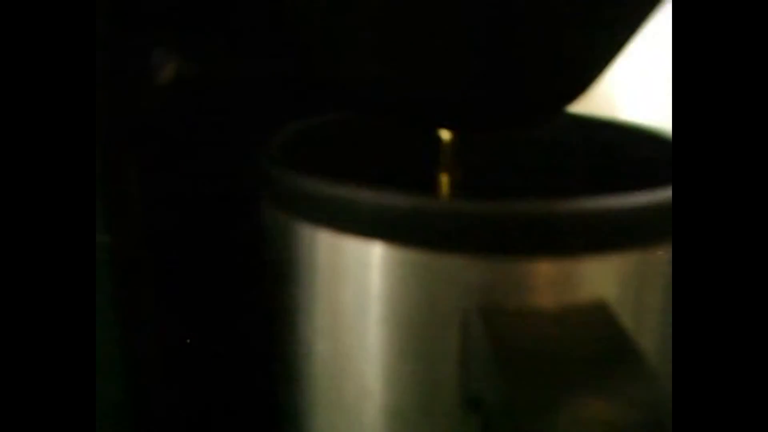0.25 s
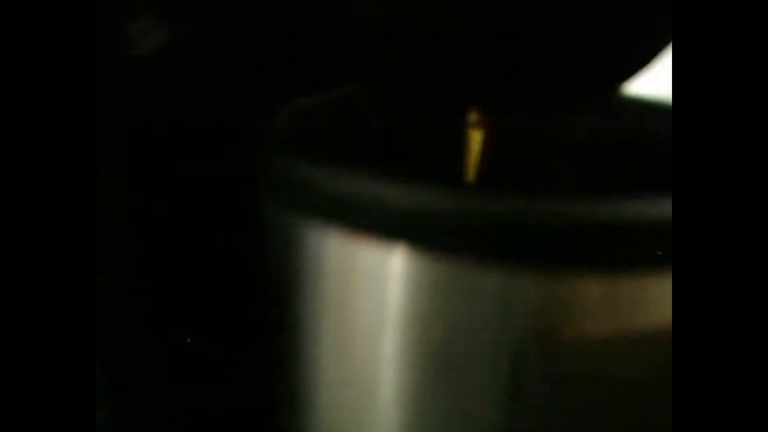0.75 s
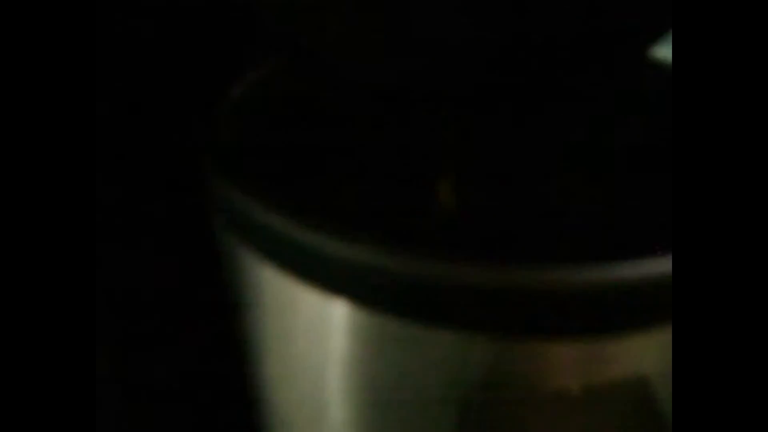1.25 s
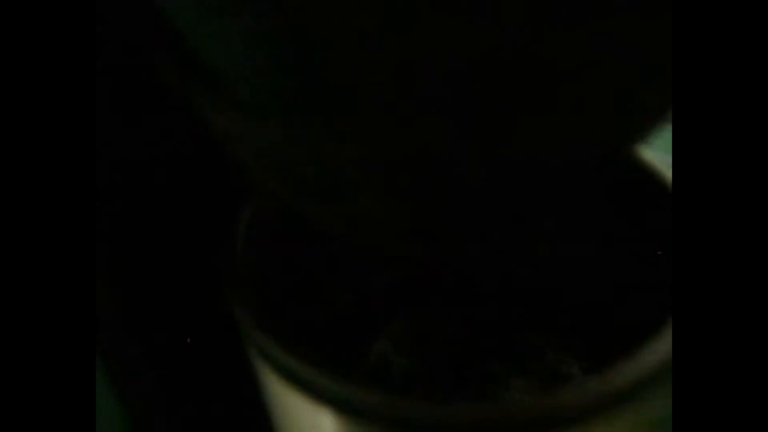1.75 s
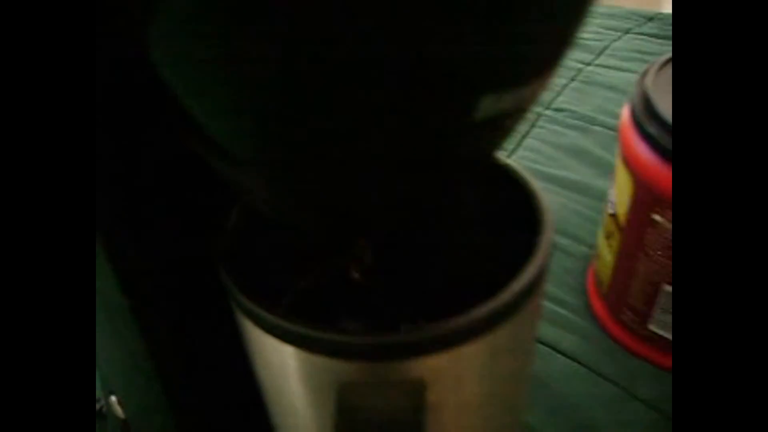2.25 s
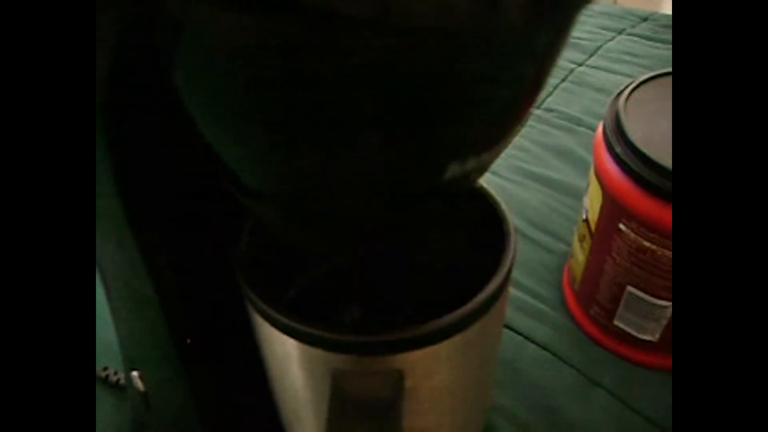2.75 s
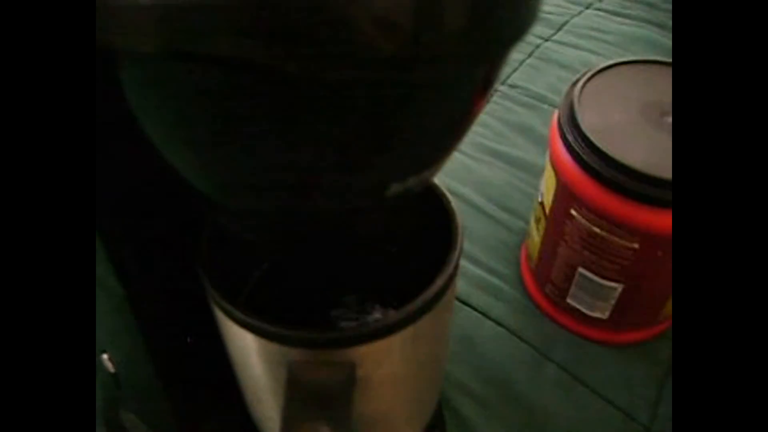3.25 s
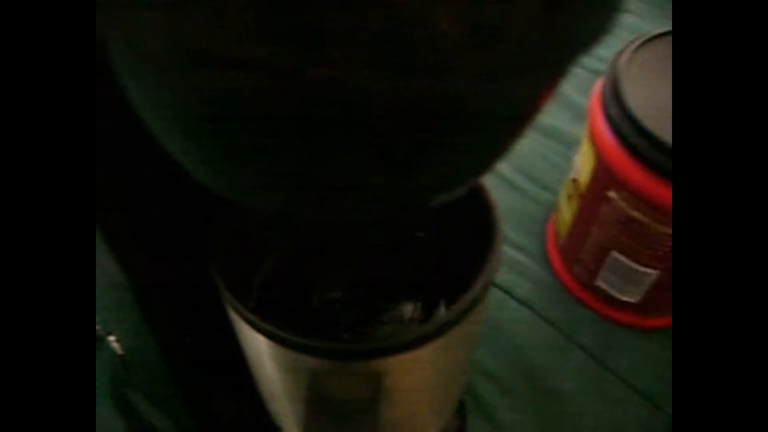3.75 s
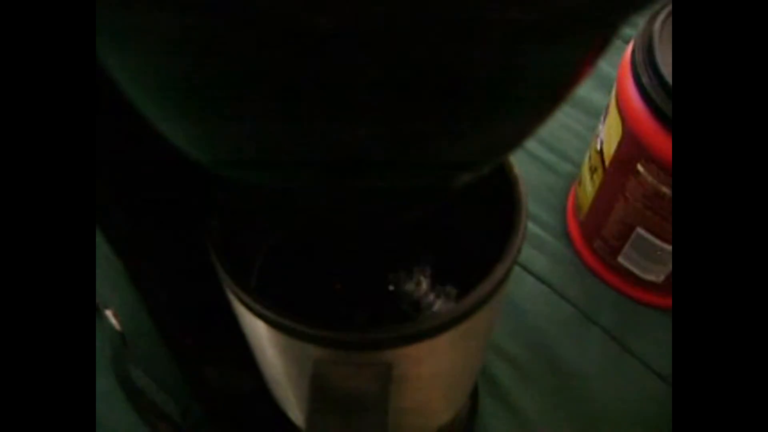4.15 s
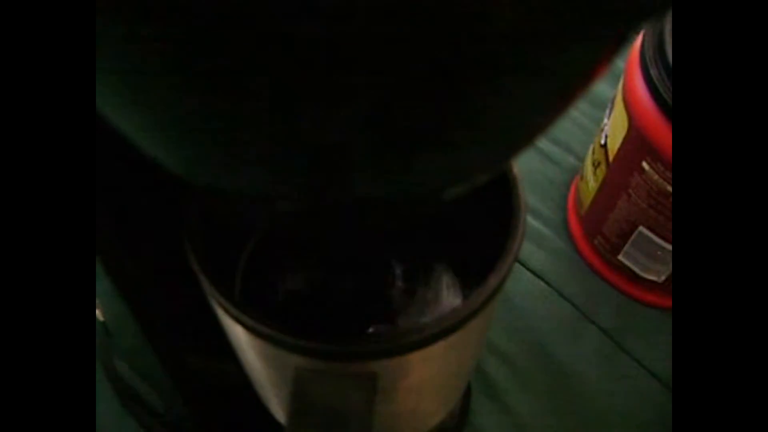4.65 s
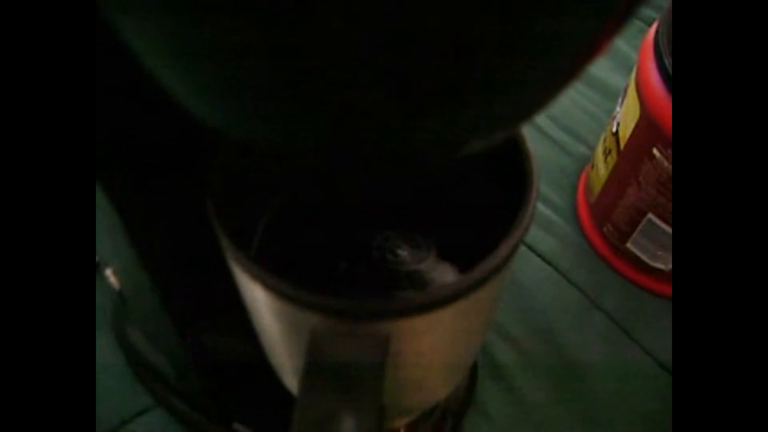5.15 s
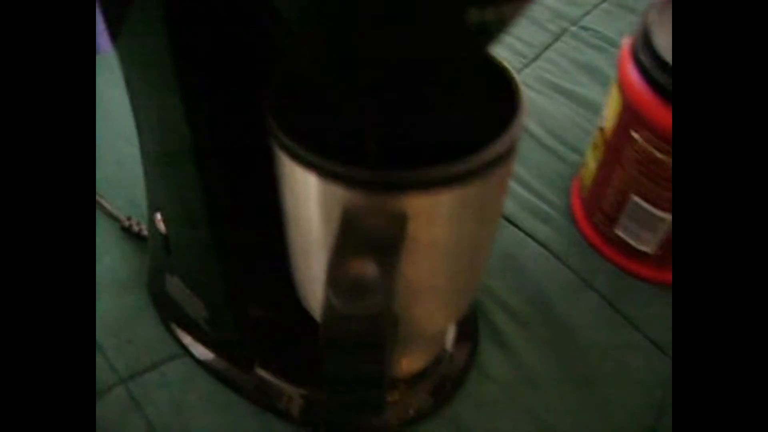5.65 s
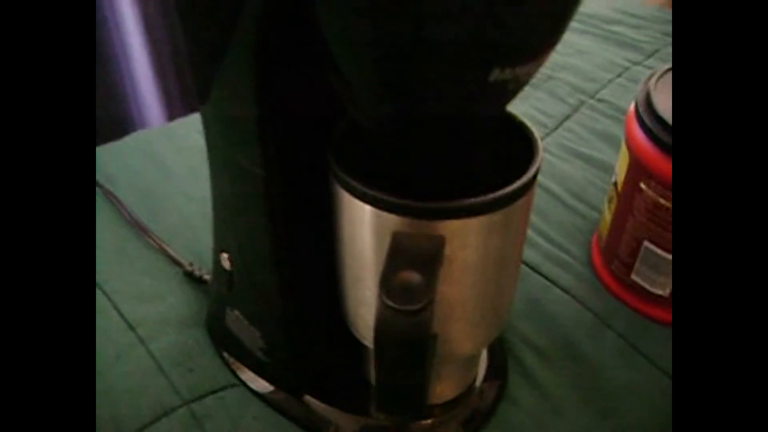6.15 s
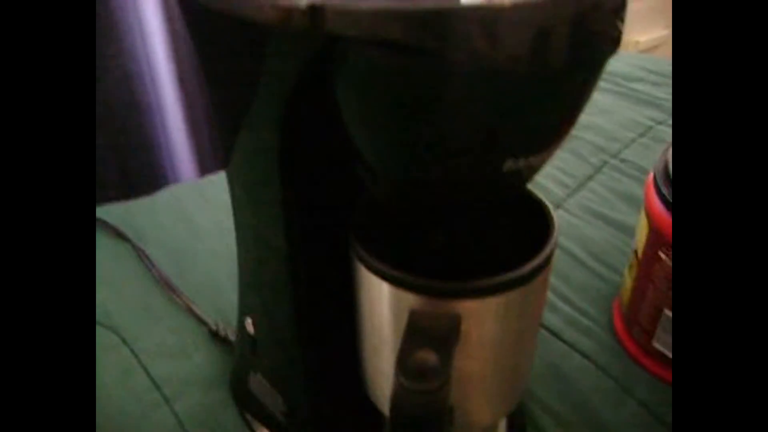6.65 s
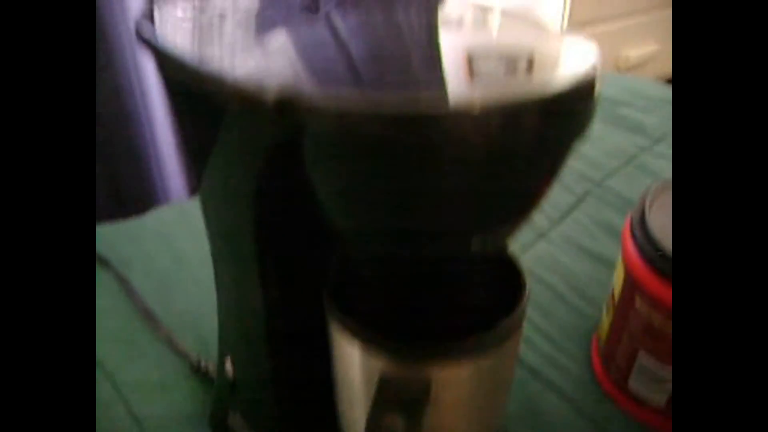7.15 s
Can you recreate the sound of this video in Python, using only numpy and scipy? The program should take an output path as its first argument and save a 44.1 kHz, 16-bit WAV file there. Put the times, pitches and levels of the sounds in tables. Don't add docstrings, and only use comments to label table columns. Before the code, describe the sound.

Close, dull-sounding gurgling and popping of a drip brewer running dry, thinning to a steady steamy simmer, then sputtering again at the end.

```python
import sys
import numpy as np
from scipy import signal
from scipy.fft import rfft, irfft, next_fast_len
from scipy.io import wavfile

SR = 44100
rng = np.random.default_rng(int(sys.argv[2]) if len(sys.argv) > 2 else 0)


def bounce(signal):
    frames = np.transpose(np.atleast_2d(signal))
    limited = np.clip(frames, -1, 1)
    pcm = np.round(limited * 32767).astype(np.int16)
    wavfile.write(sys.argv[1], SR, pcm)


def magnitude_from_level(level_db):
    exponent = np.asarray(level_db, float) / 20
    return 10 ** exponent


N = 326781


def rms_one(x):
    return x / np.sqrt(np.mean(x ** 2) + 1e-20)


def in_time(rows):
    s, *columns = np.transpose(rows)
    return [np.interp(np.arange(N) / SR, s, c) for c in columns]


def coloured(spectrum, source):
    hz, db = np.transpose(spectrum)
    size = next_fast_len(N)
    grid = np.arange(size // 2 + 1) * SR / size + 1
    shape = magnitude_from_level(np.interp(np.log(grid), np.log(hz), db))
    return rms_one(irfft(shape * rfft(source, size), size)[:N])


def flicker(rate_hz, depth_db):
    r = np.exp(-2 * np.pi * rate_hz / SR)
    slow = signal.lfilter([1], [1, -2 * r, r * r], rng.standard_normal(N + SR))[SR:]
    return magnitude_from_level(depth_db * rms_one(slow))


def pole_pair(hz, width_hz):
    r = np.exp(-np.pi * width_hz / SR)
    return r, [1, -2 * r * np.cos(2 * np.pi * hz / SR), r * r]


def resonate(x, peaks):
    out = 0
    for hz, width_hz, db in peaks:
        r, poles = pole_pair(hz, width_hz)
        out = out + magnitude_from_level(db) * signal.lfilter([1 - r, 0, r - 1], poles, x)
    return rms_one(out)


def low_passed(x, cutoff_hz):
    return rms_one(signal.sosfilt(signal.butter(2, cutoff_hz, fs=SR, output="sos"), x))


def behind_mug():
    leaves_s, leaving_s = 1.1, 0.23
    return np.clip(1 - (np.arange(N) / SR - leaves_s) / leaving_s, 0, 1)


# t/s, level/dB over the hiss
BASKET_VIEW = [(0, -17), (1.5, -16.5), (6.78, -14.5), (7.0, -8.5), (7.41, -1.5)]


def basket_view():
    return in_time(BASKET_VIEW)[0]


# t/s, churn level/dB, nearness level/dB
BOIL = [(0, 14, 1.5), (.4, 16.5, 0.5), (1.17, 15, 2), (1.32, 23.5, 5.5), (1.5, 19, 1.5), (1.75, 13.5, 2.5),
        (2.05, 10.5, .5), (2.3, 7.5, -1), (2.8, 4.5, -0.5), (3.4, 3, -1.5), (4.5, -1.5, 1.95),
        (5.55, -2.5, 2.1), (5.8, -3.5, -1.5), (6.3, -0.5, -3.5), (6.81, 2, -4), (6.87, 10.5, -2),
        (7.1, 13, 6.5), (7.41, 7.5, 5)]
# level/dB, share of churn [dB/dB], share of nearness [dB/dB],
# share of the open basket [dB/dB], gain behind the mug/dB
LAYERS = [
    (-45, 0.29, 1.04, -0.11, -1.5),
    (-53, 0.97, 0.51, 0.0013, 2),
    (-48, 0.042, 0.83, -0.033, -16),
    (-49.5, .05, 0.59, 0.081, -2),
    (-47.5, 0.075, 1, -0.79, -2.5),
]


def layer_levels(basket_db):
    churn_db, near_db = in_time(BOIL)
    opened_db = basket_db - basket_db.min()
    levels = []
    for db, churn, near, opened, mug_db in LAYERS:
        source_db = db + churn * churn_db + near * near_db
        levels.append(source_db + opened * opened_db + mug_db * behind_mug())
    return levels


# f/Hz, width/Hz, level/dB
LOWER_HOLLOW = [(614, 57, 6.5), (521, 49, -3)]
# f/Hz, width/Hz, level/dB
UPPER_HOLLOW = [(928, 83, 21), (1080, 29, -10)]
# f/Hz, width/Hz, level/dB
RIM = [(1050, 105, 0)]
# f/Hz, level/dB per Hz
TOP_SHELF = [(480, -28.5), (820, -1.5), (970, -16), (1050, -7), (1170, 4), (1550, -7), (1940, 6),
             (2070, 4.5), (2300, -3.5), (2990, -45), (5060, -120)]


def simmer():
    sizes = magnitude_from_level(5.2 * np.minimum(rng.exponential(1, N), 4)) * rng.choice([-1, 1], N)
    collapses_per_s = 350 * flicker(rate_hz=15, depth_db=5.0)
    born = rng.random(N) < collapses_per_s / SR
    smooth = rng.standard_normal(N) * flicker(rate_hz=3.87, depth_db=2.0)
    drive = rms_one(sizes * born) * 0.65 + smooth
    upper = resonate(drive, UPPER_HOLLOW)
    at_rim = resonate(resonate(drive, RIM), RIM)
    upper = upper + 0.59 * behind_mug() * (at_rim - upper)
    return resonate(drive, LOWER_HOLLOW), upper, coloured(TOP_SHELF, drive), drive


# f/Hz, width/Hz, level/dB
MOUTH = [(466, 200, 9), (820, 710, 7), (1060, 67, -18)]


def basket_mouth(drive, basket_db):
    return magnitude_from_level(-35.5 + 2.26 * basket_db) * resonate(drive, MOUTH)


# f/Hz, level/dB per Hz
HISS = [(1350, -13), (2300, -7.5), (4670, -11), (5710, -14.5), (6500, -11.5), (8450, -40), (14300, -120)]


def steam_hiss(basket_db):
    hiss = coloured(HISS, rng.standard_normal(N))
    return hiss + magnitude_from_level(basket_db) * resonate(hiss, [(4380, 1100, 0)])


def steam_leak(hiss, drive):
    return 0.48 * hiss * flicker(rate_hz=33, depth_db=2.0) + 0.17 * coloured(HISS, drive)


# f/Hz, level/dB per Hz
RUMBLE = [(15, -62), (25, -13.5), (70, -12.5), (129, -5), (150, -5), (215, 2), (414, -9), (435, -15.5),
          (480, -9), (620, -36), (1060, -120)]


def base_rumble():
    return coloured(RUMBLE, rng.standard_normal(N))


def vapour_buffeting(drive, basket_db):
    return magnitude_from_level(basket_db - 51.5) * low_passed(drive, 45)


# f/Hz, level/dB per Hz
ROOM_AIR = [(300, -29.5), (900, -6), (1800, -0.5), (3000, 0), (6500, -8), (9000, -59.5)]


def room_air():
    return magnitude_from_level(-64.5) * coloured(ROOM_AIR, rng.standard_normal(N))


# t/s, upper hollow level/dB, lower hollow level/dB over it
WET_POPS = [(.001, -23.5, -.5), (.0672, -13, -3.5), (.1584, -2, -14), (.1691, 4.5, -15.5), (.1807, -27, 3),
            (.1843, -21, -4), (.2178, -8.5, -7), (.2251, -9.5, -8), (.2685, -13, -1), (.3141, -28, -6),
            (.3429, -1, -15), (.4342, 1.5, -9.5), (.4375, 3, -26), (.4405, -3, -25), (.4493, -10, -3),
            (.4625, -5.5, -22), (.5108, -23, 1), (.5286, -30, -13), (.5945, 3.5, -15.5), (.6043, -9.5, -4),
            (.6185, -10, -24), (.6587, -13, -7.5), (.6712, -21, -14), (.6799, -22.5, -0.5),
            (.7899, -31, -3), (.8488, 0, -7), (.8572, -28, 4), (.8715, -14, -1), (.9171, -8.5, -8),
            (1.0363, -13, -9.5)]
# t/s, upper hollow level/dB, lower hollow level/dB over it
SPURT_POPS = [(1.1263, -17.5, -3), (1.1358, -14, -1), (1.1524, -19.5, -3), (1.2008, -21, 1),
              (1.2369, -8, -2), (1.2502, -21, -2), (1.266, -11.5, -1), (1.286, -23, -19), (1.3228, -24, -8),
              (1.3289, -0.5, -2.5), (1.344, -24, 8), (1.3592, 4.5, -7), (1.3608, -9, 0),
              (1.3648, -14, -29.5), (1.3755, -14.5, -13), (1.3795, -.5, -13), (1.3816, -6, -23),
              (1.3905, -8, -10), (1.3947, -7, -19.5), (1.4031, -3, -25), (1.4107, -7.5, -16)]
# t/s, upper hollow level/dB, lower hollow level/dB over it
DRY_POPS = [(1.628, -12, 1), (1.6977, -21.5, 3), (1.7117, -11, -0.5), (1.8362, -8.5, -5),
            (1.8712, -9, -5.5), (1.9468, -18, -1.5), (2.1431, -28, 3.5), (2.1948, -21, 5.5),
            (2.256, -9.5, -1.5), (2.4058, -20.5, -1), (2.448, -30, 3.5), (2.4788, -17, -3),
            (2.4825, -8, 0.5), (2.4904, -19.5, 2), (2.6482, -29, -20), (2.9258, -20.5, -8),
            (2.9274, -7, -24), (2.9382, -24, -26), (3.0944, -10.5, -3), (3.3189, -21.5, 2.5),
            (3.4103, -45, 11), (3.4905, -33, 6), (3.5855, -20.5, 1.5), (3.9123, -48, 10),
            (3.9339, -28.5, 4), (3.9864, -27, 5.5), (4.0383, -32, 2.5), (4.367, -30.5, 0), (4.435, -33, -1),
            (4.5274, -20.5, 4)]
# t/s, upper hollow level/dB, lower hollow level/dB over it
LAST_POPS = [(6.8378, -34.5, -8), (6.9499, -19, 0.5), (6.9825, -21.5, -9), (7.0049, -13, -11),
             (7.0185, -11.5, -18), (7.0615, -20.5, 1.5), (7.084, -29, 4), (7.1014, -26, 10.5),
             (7.1264, -12.5, 1), (7.1306, -28.5, 4), (7.1844, -16.5, -7), (7.1988, -19, -5)]
# t/s, level/dB
CRACKS = [(0.1719, -16), (0.5959, -16), (0.85, -24), (1.3264, -11), (1.3287, -5.5), (1.3608, -20),
          (1.3662, -16), (1.3793, -13.5), (2.1431, -48), (2.647, -50), (4.7786, -38), (6.47, -44),
          (6.95, -19), (6.9825, -27), (7.0185, -20.5), (7.1264, -27), (7.1844, -30)]
SPIT_OVER_DB = (-13.5, -15, -14.5, -12)
# t/s, f/Hz
UPPER_PITCH = [(0, 1063), (1.0, 1050), (1.37, 1040), (1.39, 980), (1.62, 1026), (4.5, 998), (7.2, 920)]


def pop_rows():
    stages = (WET_POPS, SPURT_POPS, DRY_POPS, LAST_POPS)
    s, upper_db, lower_db = np.concatenate(stages).T
    louder_db = np.maximum(lower_db, 0)
    spit_db = np.repeat(SPIT_OVER_DB, [len(stage) for stage in stages]) + louder_db
    full_db, spent_db, recharge_s = -3.5, -19.5, 0.012
    charged = np.clip(np.diff(s, prepend=-1) / recharge_s, 0, 1)
    push_db = spent_db + (full_db - spent_db) * charged + louder_db
    push_db = push_db - 6.5 * (s > LAST_POPS[0][0])
    pitch_hz = np.interp(s, *np.transpose(UPPER_PITCH)) - 2.5 * (lower_db + 10.5)
    rows = np.transpose([s, upper_db, lower_db, push_db, spit_db, pitch_hz])
    return np.vstack([rows, [(s, db - 20, 0, 0, 20, 1000) for s, db in CRACKS]])


def ring(delay, chain, stretch=1):
    out = -1. * (np.arange(900) == delay)
    for hz, width_hz in chain:
        _, poles = pole_pair(hz * stretch, width_hz)
        out = signal.lfilter([1, 0, -1], poles, out)
    return out / np.abs(out).max()


# f/Hz, width/Hz
THUMP_RING = [(330, 260)]
# f/Hz, width/Hz
UPPER_RING = [(731, 112), (927, 152), (1076, 132)]
# f/Hz, width/Hz
LOWER_RING = [(632, 63), (423, 181)]
# f/Hz, width/Hz
BASKET_RING = [(2000, 640), (2080, 250)]


def pop_bodies(rows, basket_db):
    push = signal.lfilter(*signal.butter(2, 1800, fs=SR), ring(0, THUMP_RING))
    basket = ring(10, BASKET_RING)
    ring_s = np.arange(len(push)) / SR
    body = np.zeros(N + len(push))
    for s, upper_db, lower_db, push_db, spit_db, pitch_hz in rows:
        at = round(s * SR)
        upper = ring(16, UPPER_RING, pitch_hz / 1000)
        lower = ring(5, LOWER_RING, 0.846 if s > 7.0 else 1)
        wet_loss_db_per_s = np.interp(s, (1.4, 3.0), (900, 0))
        lower = magnitude_from_level(lower_db + 1.5) * magnitude_from_level(-wet_loss_db_per_s * ring_s) * lower
        hollows = upper + lower + magnitude_from_level(spit_db + basket_db[at] + 7) * basket
        body[at:at + len(push)] += magnitude_from_level(upper_db) * (hollows + magnitude_from_level(push_db) * push)
    return body[:N]


def collapses(s, db):
    clicks = np.zeros(N)
    np.add.at(clicks, np.round(s * SR).astype(int), magnitude_from_level(db))
    return clicks


def fade(clicks, t60):
    return signal.lfilter([1], [1, -magnitude_from_level(-60 / (t60 * SR))], np.abs(clicks) + 1e-18)


def pop_splutter(rows, steam, water, basket_db):
    s, upper_db, lower_db, _, spit_db, _ = rows.T
    valve = np.sin(np.linspace(0, np.pi, round(0.0042 * SR))) ** 0.61
    spit = signal.lfilter(valve, [1], collapses(s, upper_db + spit_db - 13.5))
    spit = spit * magnitude_from_level(-.55 * basket_db)
    from_upper = collapses(s + 0.0017, upper_db - 19.0)
    from_lower = collapses(s + 0.0024, upper_db + lower_db - 27)
    gurgle = fade(from_upper + from_lower, t60=0.04)
    over_s = sum(GUSHES[-1][:2])
    filled = (np.arange(N) < over_s * SR) | (np.arange(N) > (over_s + .03) * SR)
    return spit * steam + gurgle * filled * water


# start t/s, length t/s, water level/dB, steam level/dB
GUSHES = [
    (1.317, .013, -21.5, -37),
    (1.3555, .043, -14, -31),
    (1.409, 0.0054, -13.5, -44),
]


def spurting():
    n = np.arange(N)
    return (n > GUSHES[0][0] * SR) & (n < sum(GUSHES[-1][:2]) * SR)


def gushes():
    t, water, jet = np.arange(N) / SR, 0, 0
    rise_s, sag_db_per_s = 0.002, 144.5
    for s, length_s, water_db, steam_db in GUSHES:
        shape = np.clip((t - s) / rise_s, 0, 1) * (t < s + length_s)
        sag_db = sag_db_per_s * np.clip(t - s - length_s / 2, -1, 1)
        water = water + shape * magnitude_from_level(water_db - sag_db)
        jet = jet + shape * magnitude_from_level(steam_db)
    return water, jet


def long_spurt(water, top, hiss, rumble, drive):
    gush, jet = gushes()
    surge = low_passed(drive, 120)
    return gush * (water + .3 * surge + 0.33 * rumble) + jet * (hiss + 2.0 * top)


# f/Hz, width/Hz
DIPS = [(770, 45), (2280, 300)]


def housing(x):
    for hz, width_hz in DIPS:
        w = 2 * np.cos(2 * np.pi * hz / SR)
        deep, wide = np.exp(-np.pi * .3 * width_hz / SR), np.exp(-np.pi * width_hz / SR)
        x = signal.lfilter([1, -deep * w, deep ** 2], [1, -wide * w, wide ** 2], x)
    return x


def scene():
    basket_db = basket_view()
    lower_db, upper_db, top_db, hiss_db, rumble_db = layer_levels(basket_db)
    lower, upper, top, drive = simmer()
    boil = magnitude_from_level(lower_db) * lower + magnitude_from_level(upper_db) * upper + magnitude_from_level(top_db) * top
    boil = boil + basket_mouth(drive, basket_db)

    hiss, rumble = steam_hiss(basket_db), base_rumble()
    steam = magnitude_from_level(hiss_db) * steam_leak(hiss, drive)
    base = magnitude_from_level(rumble_db) * rumble * flicker(rate_hz=3.4, depth_db=-1.3)
    base = base + vapour_buffeting(drive, basket_db)

    screen = behind_mug()
    water = (1 - .4 * screen) * lower + 0.98 * upper + 0.064 * top * (1 - screen)
    spit_steam = hiss + 0.94 * top * (1 - 0.7 * screen)
    spit_steam = spit_steam * (1 - 0.52 * spurting())
    rows = pop_rows()
    body = pop_bodies(rows, basket_db)
    splutter = pop_splutter(rows, spit_steam, water * ~spurting(), basket_db)
    spurt = long_spurt(water, top, hiss, rumble, drive)
    return (housing(boil + steam + spurt + splutter) + body + base + room_air())[None]


def top_cut(x):
    return signal.sosfilt(signal.butter(12, 15870, fs=SR, output="sos"), x)


def record(dry):
    narrow = signal.sosfilt(signal.butter(1, 30, "high", fs=SR, output="sos"), dry)
    narrow = np.clip(narrow, -0.924, 0.924)
    narrow = signal.sosfilt(signal.butter(4, 9500, fs=SR, output="sos"), narrow)
    narrow = signal.sosfilt(signal.cheby2(8, 50, 7300, fs=SR, output="sos"), narrow)
    loaded = np.clip(narrow, -.985, .985)
    return top_cut(loaded)


dry = scene()
out = record(dry)
bounce(out)
```